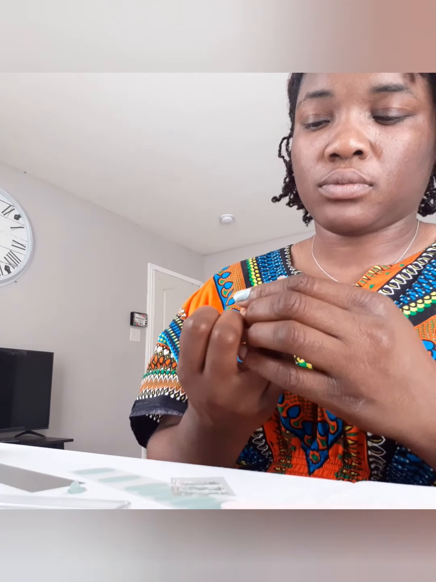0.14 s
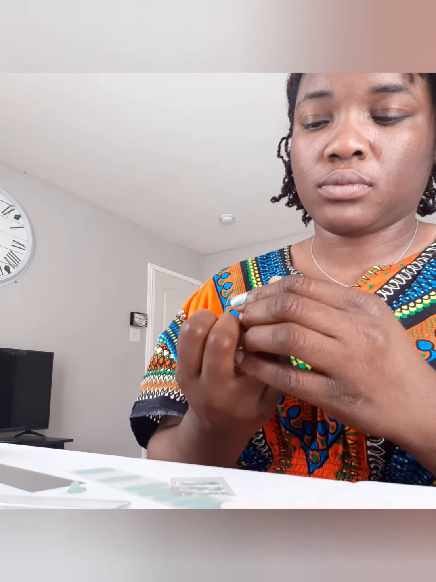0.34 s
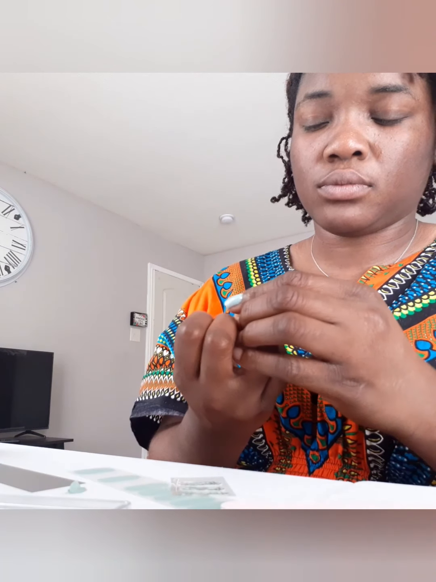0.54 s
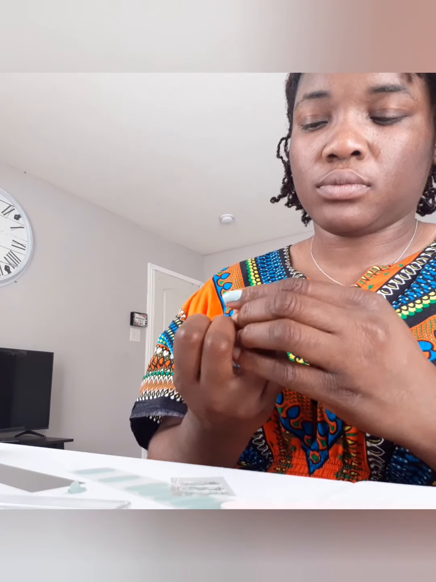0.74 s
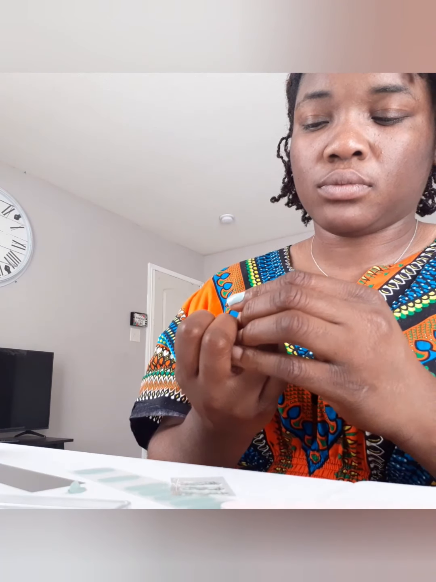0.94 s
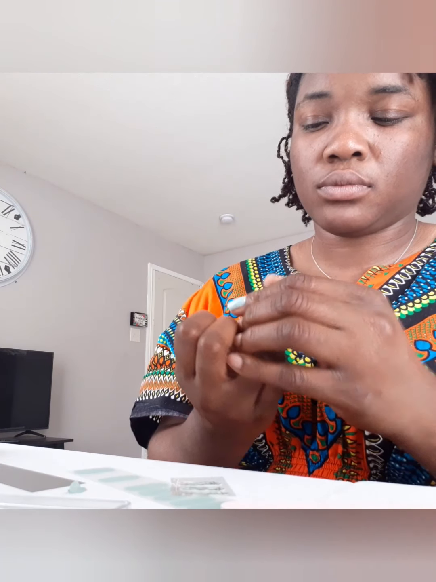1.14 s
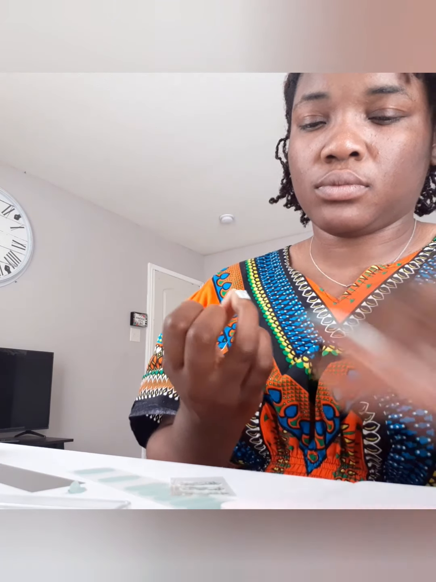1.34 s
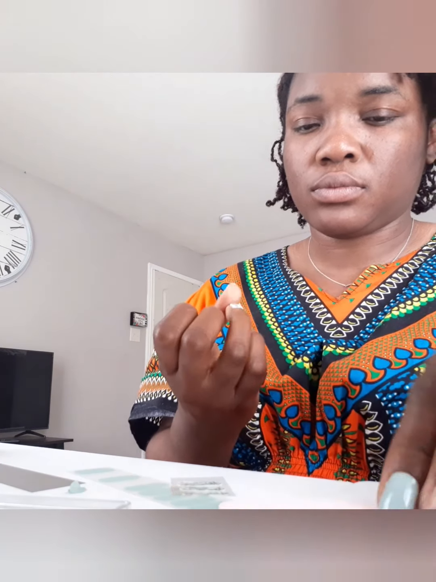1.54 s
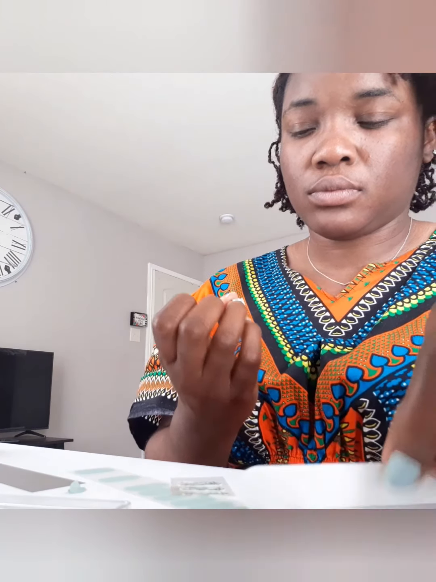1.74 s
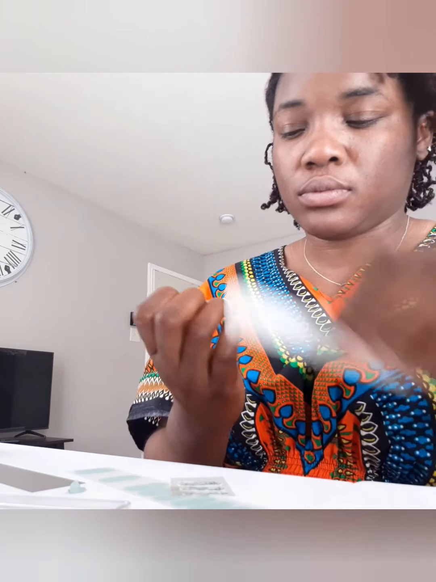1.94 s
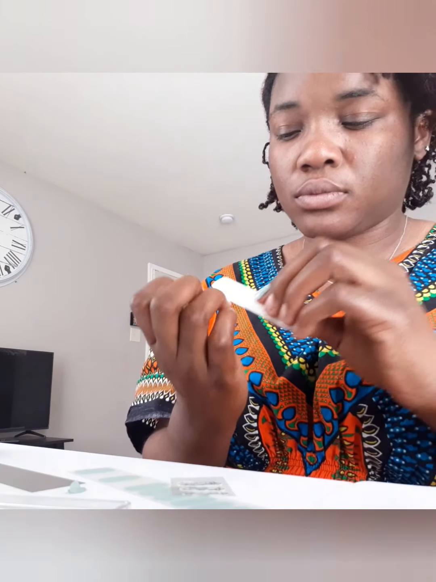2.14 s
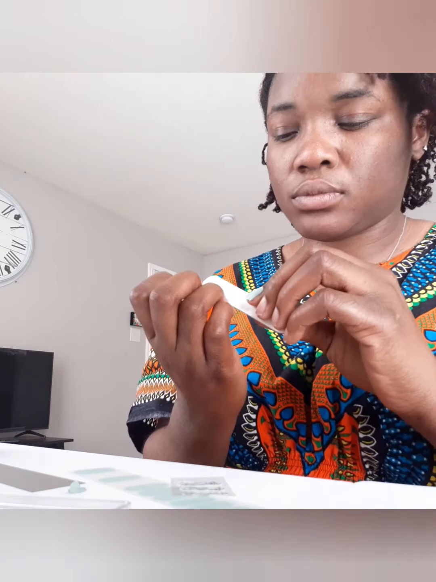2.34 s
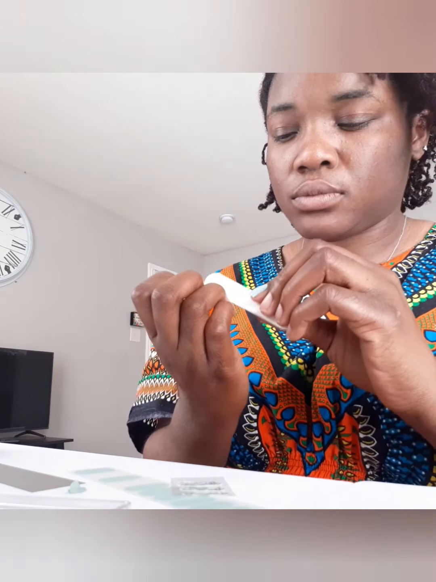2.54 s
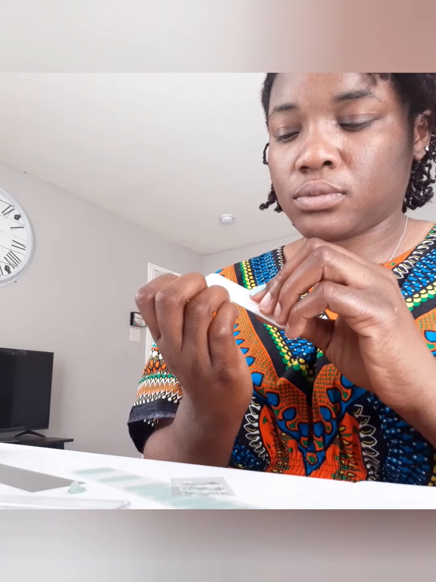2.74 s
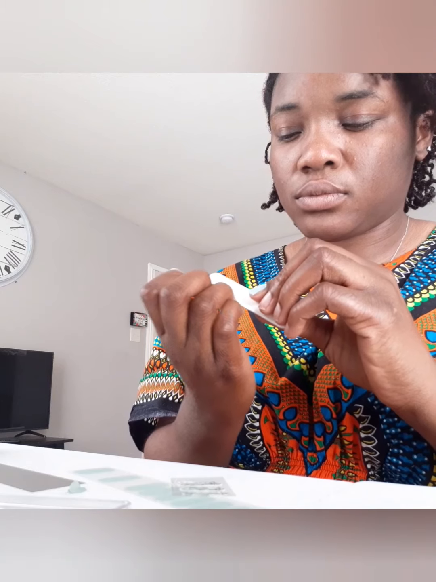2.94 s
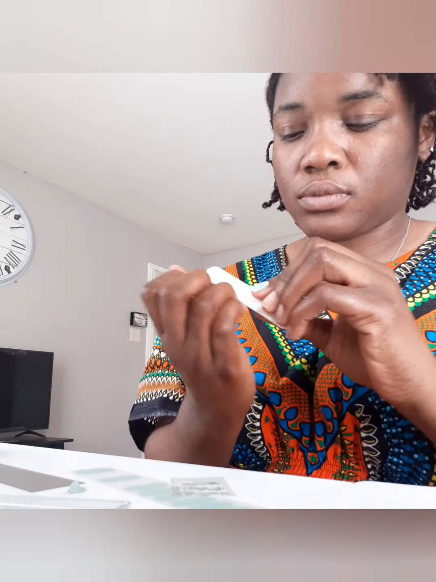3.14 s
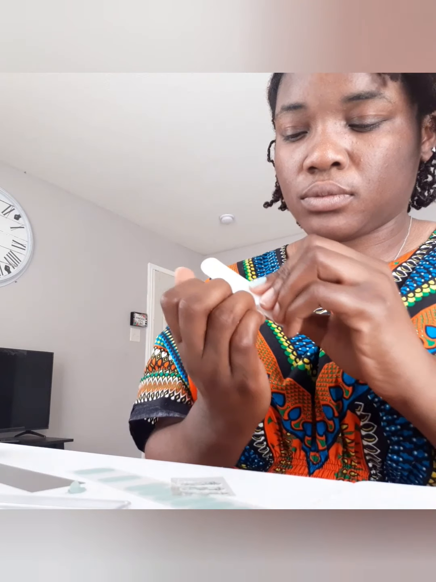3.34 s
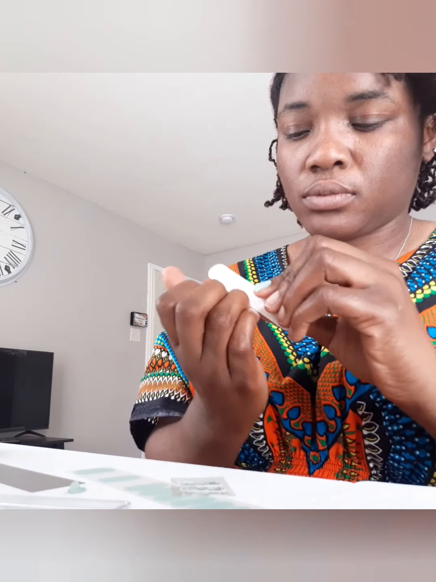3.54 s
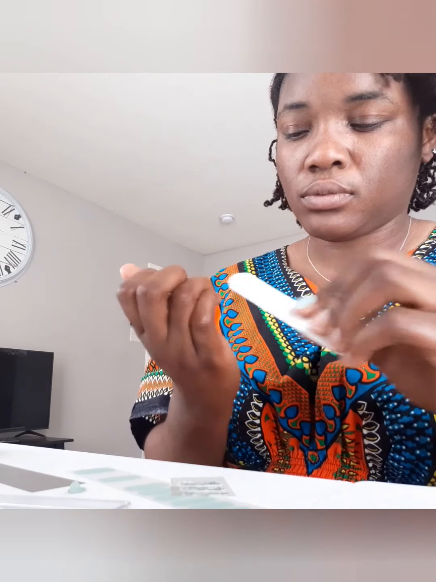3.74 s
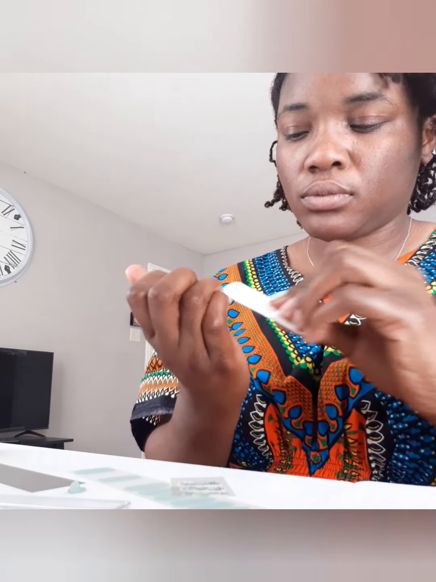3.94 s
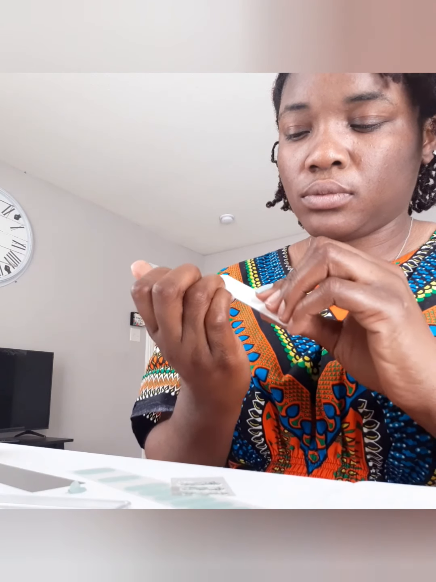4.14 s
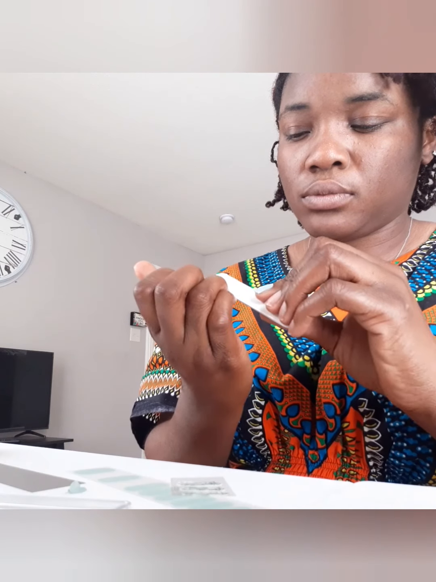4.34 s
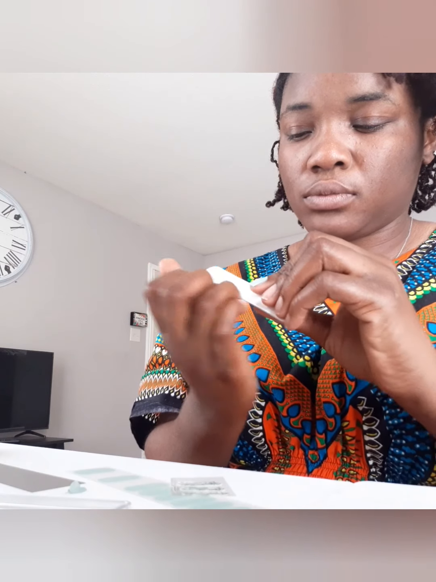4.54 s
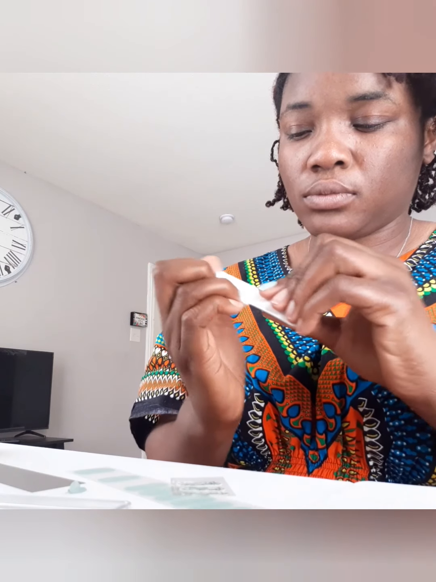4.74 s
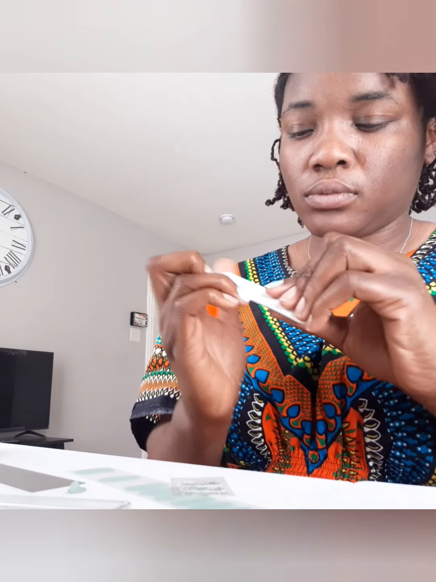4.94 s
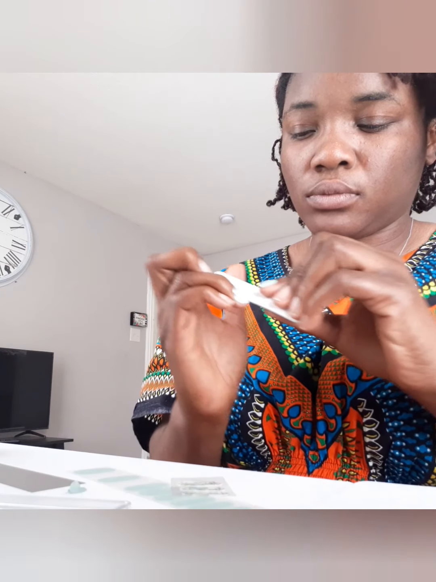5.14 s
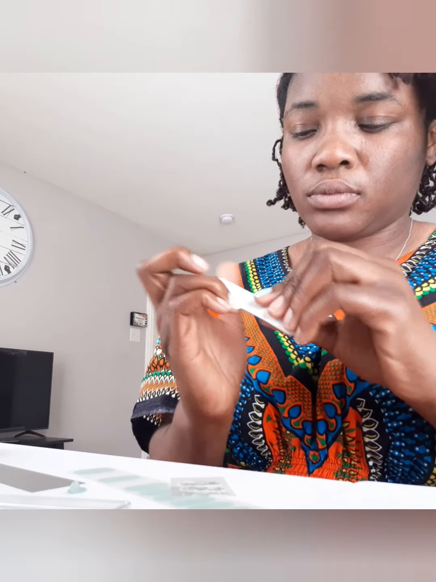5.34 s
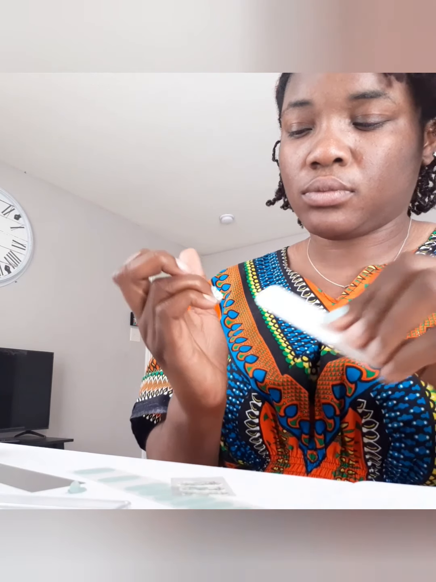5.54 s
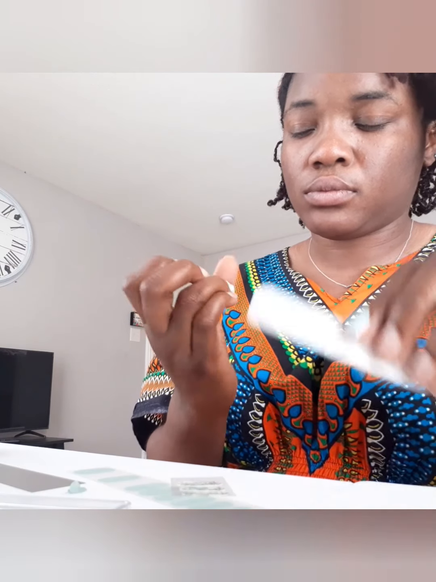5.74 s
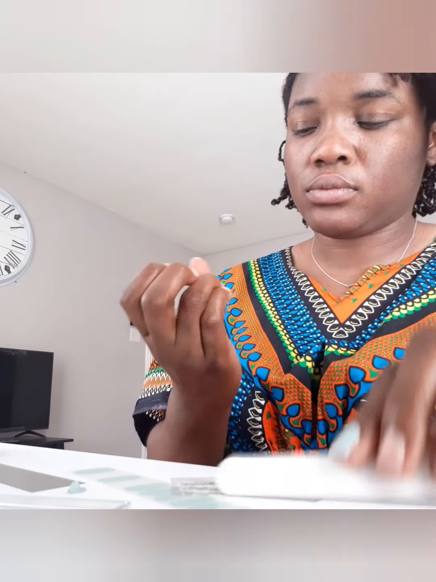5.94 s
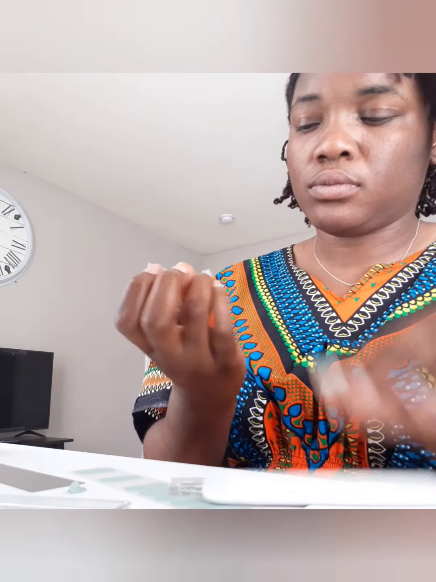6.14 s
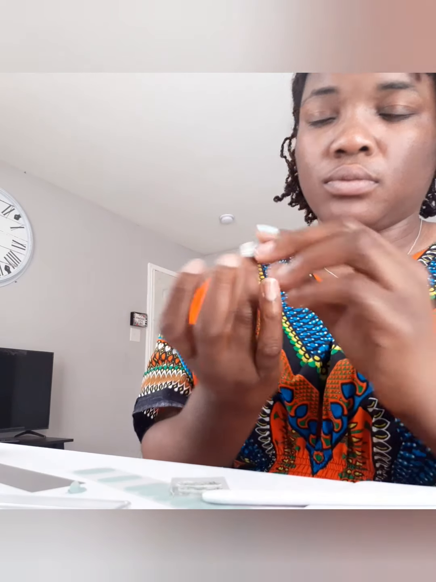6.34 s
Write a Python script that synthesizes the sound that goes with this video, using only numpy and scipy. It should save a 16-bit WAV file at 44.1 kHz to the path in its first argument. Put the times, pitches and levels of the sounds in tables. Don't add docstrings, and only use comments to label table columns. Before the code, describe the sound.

Close stereo phone pickup at a table indoors, faint hum and hiss beneath. A light foam file is dragged off the tabletop with dull knocks and a sharp loud clack, then cloth rustles barely audibly. Quick gritty strokes scratch a nail, pause, and resume softer and more evenly spaced. The file returns with a clack, a brief scrape and a crisp flat slap with a little bounce.

```python
import sys
import numpy as np
from scipy import signal
from scipy.fft import rfft, irfft, next_fast_len
from scipy.io import wavfile
from scipy.ndimage import uniform_filter1d, map_coordinates

SR = 44100
rng = np.random.default_rng(int(sys.argv[2]) if len(sys.argv) > 2 else 0)


def invert_db(level):
    return 10 ** (np.asarray(level, dtype=float) / 20)


def store_pcm(level_fs):
    pcm = np.round(np.clip(level_fs, -1, 1) * 32767).astype(np.int16)
    wavfile.write(sys.argv[1], SR, np.atleast_2d(pcm).T)


N = 285449

# [start t/s, rise t/s, hold t/s, nail ring level/dB, relative dust hiss level/dB]
STROKES = [(3.18, 0.047, 0.015, -62.5, -1.5), (3.282, 0.018, 0.0045, -55, -4.5),
           (3.3, 0.0085, 0.033, -48, -6.5), (3.35, 0.0093, 0.016, -61, -4),
           (3.382, 0.0062, 0.0174, -65.5, -5.5), (3.442, 0.013, 0.04, -57, -1.5),
           (3.651, 0.0038, 0.021, -55, -2), (3.655, 0.031, 0.047, -48.5, 0), (3.69, 0.032, .013, -59, 9.5),
           (4.44, 0.056, 0.055, -61.5, -2.5), (4.615, 0.026, 0.029, -59.5, -1),
           (4.68, 0.018, 0.07, -77, 0.5), (4.745, 0.021, 0.043, -60.5, -3),
           (4.82, 0.013, 0.078, -77.5, -3.5), (4.9, 0.019, 0.017, -61, -0.5),
           (4.95, 0.055, 0.035, -71.5, -6), (5.005, 0.023, 0.06, -60, -4), (5.1, .01, .04, -77, 3),
           (5.135, 0.053, 0.026, -61.5, 0.5), (5.27, 0.024, 0.14, -81, -0.5), (5.385, 0.03, 0.055, -55, 0),
           (5.42, 0.028, 0.012, -57.5, 6.5)]
# [rise power, sag over the hold/dB, release/(dB/s), hiss growth/(dB/s),
# depth below which it lingers/dB, lingering decay/(dB/s)]
STROKE_SHAPE = (0.94, 2.9, 1000, 35, 14, 250)
# [level/dB under a -64 dB contact, share of pressure followed, share lost to hiss]
FINGER_THRUM = (-69, 0.6, 0.68)
# [t/s, level/dB]
FINGER_GRIP = [(3.2, 0.5), (3.32, -6.5), (3.47, -0.5), (3.68, -0.5), (3.73, 4.5), (4.5, -2.5), (4.65, 1.5),
               (4.78, -1.5), (4.93, -0.5), (5.04, -1), (5.12, 7), (5.18, -7), (5.42, -8.5), (5.47, -4)]
# [t/s, share of the stiffer spot 0-1]
NAIL_LEAN = [(3.2, 0.1), (3.3, 0.43), (3.36, 0.34), (3.47, 0.84), (3.66, 0.34), (3.7, .1), (3.73, 0.57),
             (4.47, 0.51), (4.53, 0.66), (4.65, 0.13), (4.77, 0.17), (4.92, 1), (5.02, 0.3), (5.08, 0.5),
             (5.18, 0.6), (5.4, 0.26), (5.46, 0.33)]
# [f/Hz, width/Hz, level/dB]
NAIL_MODES = [(1724, 144, 3.5), (2146, 440, 1.5), (3510, 360, -6.5), (4070, 120, -5.5), (4760, 2200, -6.5),
              (6900, 2050, -12.5)]
# [f/Hz, width/Hz, level/dB]
DUST_MODES = [(8620, 690, 0), (11000, 1500, 0.5), (13000, 1500, -1), (15930, 770, -8)]
# [f/Hz, width/Hz, level/dB]
FINGER_MODES = [(470, 155, -4), (684, 59, 1.5), (964, 520, -2)]
# [f/Hz, width/Hz, level/dB]
FINGERTIP_MODES = [(504, 360, -2), (774, 430, -0.5)]
# [t/s, peak level/dB, relative boom level/dB, relative snap level/dB, ring t60/s]
TICKS = [(3.235, -49.5, -27, -22, 0.012), (3.3942, -74, 3, -4.5, 0.02), (3.6368, -66, -1.5, -4, 0.017),
         (3.654, -61, -14, 1.5, 0.023), (3.7356, -54, 14.5, 6, 0.0064), (3.8791, -70.5, 5.5, -13.5, 0.018),
         (4.621, -73, -13, -6, 0.016), (4.7242, -61, 0, -4, 0.03), (4.848, -70, 10, -9, 0.017),
         (4.918, -51.5, -2, -3.5, 0.021), (5.017, -47.5, -14, -10, 0.036), (4.7511, -49, -28, -10, 0.019),
         (4.9876, -51, -7, -11, 0.02), (5.2697, -61, -8, -18.5, 0.019), (5.2883, -61, -15, -13.5, 0.02),
         (5.3056, -61, -14, -13, 0.031), (5.3317, -69, 4, -6.5, 0.022), (5.4734, -64, 18, 7.5, 0.021)]
# [start t/s, length t/s, level/dB, f/Hz, relative hiss level/dB]
FLICKS = [(3.225, .007, -64, 7500, 8), (3.443, .008, -66, 5500, 2.5), (5.305, .005, -80, 11000, 1),
          (5.348, .005, -80, 9500, 1), (3.305, 0.02013, -51, 2200, -14), (3.683, 0.023, -47.5, 1757, -15),
          (3.7397, 0.0054, -42.5, 5300, 7), (3.739, 0.0075, -48, 2200, -5), (3.749, 0.0056, -68, 6000, 1.5),
          (4.705, .005, -78, 9500, -2.5), (4.986, 0.0034, -69, 6000, 1), (5.092, .008, -63, 1900, -20),
          (5.47, 0.0057, -58, 4970, 4.5)]
# [f/Hz, level/dB]
NAIL_SIDE = [(400, 13.5), (1000, 2.5), (1600, 15), (2400, 14), (3600, -0.5), (5000, 18), (7000, -7.5),
             (9000, -3.5), (12000, 2.5), (15000, 10)]


def filing():
    levels = pressure(STROKES, STROKE_SHAPE, FINGER_THRUM)
    levels[2] += np.interp(np.arange(N) / SR, *np.transpose(FINGER_GRIP))
    rasp = friction(levels, (NAIL_MODES, DUST_MODES, FINGER_MODES), gain_db=1.5, alike=(.6, .45, .6),
                    per_s=12000, spread_db=3.5, clump_db=1.5, shift_db=2.0, lean=NAIL_LEAN, stiffer=1.143)
    ticks = blows(TICKS, (NAIL_MODES[:3], DUST_MODES, FINGERTIP_MODES), (4, -3, 2.5), rattles_db=(-18, -12, -26))
    flicks = scuffs(FLICKS, DUST_MODES, sharpness=4.9)
    return heard(rasp, ticks + flicks, NAIL_SIDE, lag=4, right_db=-3.0, near_db=-9.0, room_db=-10.0)


# [start t/s, length t/s, level/dB, from f/Hz, to f/Hz]
SINGS = [(3.2, .05, -64, 2300, 1760), (3.295, .085, -58, 2200, 1900), (3.3, 0.054, -59.5, 4130, 4300),
         (3.445, 0.046, -60, 2300, 2420), (3.45, 0.042, -63.5, 3620, 3550), (3.665, .07, -54.5, 1800, 2070),
         (3.69, .05, -57.5, 11500, 11800), (4.46, 0.074, -66, 2050, 2200), (4.465, .09, -65.5, 9900, 10200),
         (4.62, .058, -66, 2010, 1790), (4.625, 0.042, -64.5, 8700, 8900), (4.76, 0.045, -59.5, 2300, 2200),
         (4.76, 0.033, -64.5, 8800, 8900), (4.905, 0.065, -63.5, 2300, 1910),
         (5.018, .085, -56.5, 2410, 2050), (5.015, .06, -64, 8700, 8540), (5.15, .05, -62, 2400, 2470),
         (5.185, .05, -66.5, 1800, 1720), (5.16, .05, -67, 3460, 3500), (5.395, 0.063, -62, 1820, 1890),
         (5.43, .05, -56, 11200, 14500)]


def singing():
    spots = []
    for s, length, db, *pitches in SINGS:
        for late, hz in zip((0, .38), pitches):
            spots.append((s + late * length, .62 * length, db, hz, -24))
    sung = scuffs(spots, DUST_MODES, sharpness=11.0)
    return heard(np.zeros((2, N)), sung, NAIL_SIDE, lag=4, right_db=-9.0, near_db=-7.0, room_db=-13.0)


# [start t/s, rise t/s, hold t/s, scrape level/dB, relative hiss level/dB]
SLIDES = [(1.47, 0.075, 0.03, -53.5, 0.5), (1.56, 0.029, 0.015, -42.5, -5), (1.6, 0.049, 0.012, -40, -10),
          (1.675, 0.032, 0.041, -53.5, -14), (1.733, 0.0046, 0.032, -51, -16.5),
          (1.765, 0.012, 0.057, -48, -10), (1.825, 0.022, 0.013, -44, -17),
          (5.92, 0.05, 0.018, -96.5, 21.5), (5.995, 0.044, 0.023, -51, -10.5),
          (6.04, 0.0064, 0.018, -34.5, -19.5), (6.085, 0.023, 0.04, -57.5, -12.5),
          (6.112, 0.041, 0.014, -49.5, -17.5), (6.245, 0.006, 0.012, -66, -16),
          (6.274, 0.0046, 0.018, -48, -21.5), (6.3, 0.034, 0.13, -74.5, -24)]
SLIDE_SHAPE = (1.2, 6.6, 770, 5, 25, 300)
# [level/dB under a -64 dB contact, share of pressure followed, share lost to hiss]
TABLE_DRONE = (-66, 0.84, 0.32)
# [t/s, share of the stiffer spot 0-1]
TABLE_LEAN = [(1.5, 0.46), (1.6, 0.3), (1.66, 0.45), (1.76, .6), (1.85, 0.2), (6.0, 0.7), (6.06, 0.03),
              (6.14, 0.3), (6.3, 0.05)]
# [f/Hz, width/Hz, level/dB]
TOP_MODES = [(984, 270, 6), (1450, 450, -0.5), (2030, 764, -3.5), (3014, 1400, -4.5), (4600, 1600, -7)]
# [f/Hz, width/Hz, level/dB]
FOAM_MODES = [(6500, 4900, -15), (9600, 2500, -2.5), (11500, 2500, -1.5), (14500, 3400, -7)]
# [f/Hz, width/Hz, level/dB]
BOOM_MODES = [(203.4, 82, -4), (308.7, 45, 0), (506, 81, -2), (770, 330, -10)]
# [t/s, peak level/dB, relative boom level/dB, relative snap level/dB, ring t60/s]
KNOCKS = [
    (1.31, -61.5, 4.5, -8, 0.18),
    (1.456, -64, 0, -9, 0.05),
    (1.48, -72, 22, -22, 0.06),
    (1.66, -49.5, 14, -13.5, 0.099),
    (1.565, -39, -3.5, -1, 0.39),
    (1.738, -43.5, -2, 3, 0.03),
    (5.604, -65.5, 2.5, -4.5, 0.13),
    (5.802, -64.5, -2, -7, 0.087),
    (6.024, -41.5, 5, -7.5, 0.15),
    (6.136, -45.5, -2.5, -27, 0.4),
]
# [f/Hz, width/Hz, level/dB]
THUD_MODES = [(1030, 100, 9.5), (1400, 520, 1), (2200, 920, -2), (3400, 1700, -6)]
# [f/Hz, width/Hz, level/dB]
SNAP_MODES = [(2480, 1800, -7.5), (4600, 1300, -1), (6600, 2000, -7.5), (8994, 1300, -1.5),
              (11700, 7200, -9.5)]
# [t/s, peak level/dB, relative boom level/dB, relative snap level/dB, ring t60/s]
DROPS = [
    (6.2418, -27.5, 2.5, 3.5, 0.019),
    (6.2448, -27.5, -4, -27, 0.04),
    (6.2785, -42.5, 2, -24, 0.1),
]
# [f/Hz, width/Hz, level/dB]
FLAT_MODES = [(1065, 72, 10), (1300, 470, -2), (2200, 1400, -11.5), (3400, 710, -8.5)]
# [f/Hz, width/Hz, level/dB]
SLAP_MODES = [(2480, 1800, -8.5), (4546, 1700, 0.5), (5730, 1500, -2.5), (9500, 2100, -9),
              (11200, 1500, -16.5)]
# [t/s, peak level/dB, relative boom level/dB, relative snap level/dB, ring t60/s]
CLACKS = [
    (1.7833, -11, -13.5, -30, 0.06),
    (6.046, -29.5, -8, -23, 0.082),
    (6.092, -61.5, 17, -15, 0.068),
]
# [f/Hz, width/Hz, level/dB]
RIM_MODES = [(758.5, 200, 4), (1150, 200, 5.5), (1710, 300, -2.5), (2028, 160, -0.5), (2700, 1700, -9.5)]
# [f/Hz, width/Hz, level/dB]
RIM_BOOM_MODES = [(231.4, 140, -5), (296, 25, 1.5), (500, 92, 1), (800, 150, -9)]
# [start t/s, length t/s, level/dB, f/Hz, relative hiss level/dB]
SCUFFS = [(1.478, .02, -48, 259.4, -40), (1.737, 0.0056, -49.5, 1913, -0.5), (6.3, 0.067, -59, 940, -18),
          (1.565, 0.011, -40, 1150, -12), (1.581, 0.015, -36.5, 1400, -11),
          (1.589, 0.011, -45, 3130, -10.5), (1.634, 0.026, -38, 1384, -19), (1.652, 0.008, -46, 4600, -11),
          (1.736, 0.0078, -45.5, 4880, 1.5), (1.744, 0.012, -51, 3400, -10.5),
          (1.765, 0.013, -54, 3320, -19.5), (1.771, 0.015, -43, 1283, -17), (1.837, 0.0081, -46, 3200, -16),
          (1.847, 0.014, -46.5, 3220, -1.5), (6.022, 0.0066, -42.5, 1990, -14.5),
          (6.045, 0.019, -35.5, 1127, -21.5), (6.055, 0.012, -38, 3290, -15), (6.09, .018, -52, 594, -24.5),
          (6.134, 0.01, -50, 3200, -16.5), (6.148, .016, -47.5, 1096, -19), (6.25, 0.016, -37, 1050, -22.5),
          (6.277, 0.017, -39, 1030, -23.5), (6.252, .014, -38, 326, -30.5), (6.06, 0.011, -38, 518, -30),
          (1.79, 0.025, -41, 1070, -20)]
# [f/Hz, level/dB]
TABLE_SIDE = [(200, 2), (350, 7.5), (850, -1), (1200, 6.5), (3000, 5), (4300, 3), (8000, -3.5),
              (10500, 12.5), (15000, 6.5)]


def table():
    levels = pressure(SLIDES, SLIDE_SHAPE, TABLE_DRONE)
    scrape = friction(levels, (TOP_MODES, FOAM_MODES, BOOM_MODES), gain_db=-1.5, alike=(.5, .3, .75),
                      per_s=9800, spread_db=0.0, clump_db=0.5, shift_db=3.0, lean=TABLE_LEAN, stiffer=1.33)
    gains_db = (4, 4, 2.5)
    hits = blows(KNOCKS, (THUD_MODES, SNAP_MODES, BOOM_MODES), gains_db, rattles_db=(-29, -11, -29))
    hits += blows(DROPS, (FLAT_MODES, SLAP_MODES, BOOM_MODES), gains_db, rattles_db=(-25, -11, -29))
    hits += blows(CLACKS, (RIM_MODES, SNAP_MODES, RIM_BOOM_MODES), gains_db, rattles_db=(-31, -12, -28))
    hits += scuffs(SCUFFS, SNAP_MODES, sharpness=9)
    return heard(scrape, hits, TABLE_SIDE, lag=21, right_db=-9.0, near_db=-13.5, room_db=-14.0)


def pressure(rows, shape, low):
    power, sag_db, release_db, grows_db, linger_db, dies_db = shape
    low_db, follows, lost = low
    energy = np.full((3, N), 1e-14)
    for s, rise, hold, db, hiss_db in rows:
        a = round(s * SR)
        t = np.arange(min(round((rise + hold) * SR) + SR // 12, N - a)) / SR
        after = np.maximum(t - rise - hold, 0)
        swell = 20 * power * np.log10(np.clip(t / max(rise, .002), 1e-3, 1))
        sag = sag_db * np.clip((t - rise) / max(hold, .002), 0, 1)
        release = np.minimum(release_db * after, linger_db + dies_db * after)
        growth = grows_db * np.minimum(t - rise, hold).clip(-.05, .05)
        main = np.full(len(t), db)
        deep = np.full(len(t), low_db + follows * (db + 64) - lost * hiss_db)
        levels = np.array([main, db + hiss_db + growth, deep])
        energy[:, a:a + len(t)] += invert_db(swell - sag - release + levels) ** 2
    return 10 * np.log10(energy)


def friction(levels, bodies, gain_db, alike, per_s, spread_db, clump_db, shift_db, lean, stiffer):
    touching = levels[0] > -135
    sizes = grit(touching.sum(), per_s, spread_db, clump_db)
    stiff = np.clip(np.interp(np.flatnonzero(touching) / SR, *np.transpose(lean)), 0, 1)
    rub = 0
    for k, (db, share, body) in enumerate(zip(levels[:, touching], alike, bodies)):
        a, b = sizes * rng.choice([-1, 1], (2, len(sizes)))
        grains = np.array([a, share * a + np.sqrt(1 - share ** 2) * b])
        ring = unit(ringing(grains, body))
        if k == 0:
            raised = [(hz * stiffer, width, gain) for hz, width, gain in body]
            stiff_ring = unit(ringing(grains[:, ::-1], raised))
            ring = np.sqrt(1 - stiff) * ring + np.sqrt(stiff) * stiff_ring
        rub = rub + invert_db(db + gain_db) * ring
    out = np.zeros((2, N))
    out[:, touching] = shifting(rub, shift_db)
    return out


def grit(size, per_s, spread_db, clump_db):
    chance, rarity = rng.random((2, size))
    sizes = invert_db(-spread_db * np.log(rarity + 4e-3) + clump_db * wobble(90, size))
    return (chance < per_s / SR) * sizes


def shifting(x, depth_db):
    z = signal.stft(x, nperseg=256)[2]
    field = rng.standard_normal(z.shape[1:])
    field = uniform_filter1d(uniform_filter1d(field, size=7, axis=0), size=16, axis=1)
    return signal.istft(z * invert_db(depth_db * unit(field)), nperseg=256)[1][:, :x.shape[1]]


def blows(events, bodies, gains_db, rattles_db):
    out, t = np.zeros(N + SR), np.arange(SR // 8) / SR
    lives = (1, .4, 1.3)
    for s, db, low_db, snap_db, t60 in events:
        noise = rng.standard_normal(len(t))
        start = round((s + .0012) * SR)
        levels = (db, db + snap_db, db + low_db)
        for level, gain_db, rattle_db, life, body in zip(levels, gains_db, rattles_db, lives, bodies):
            rattle = invert_db(rattle_db - 60 * t / max(life * t60, .003)) * noise
            rattle[0] = -1
            struck = [(hz * (1 + 0.017 * rng.normal()), w, g + rng.normal()) for hz, w, g in body]
            ring = ringing(rattle, struck)
            out[start:start + len(t)] += invert_db(level + gain_db) * ring / np.abs(ring).max()
    return out[:N]


def scuffs(events, skin, sharpness):
    out = np.zeros(N + SR)
    for s, length, db, hz, hiss_db in events:
        noise = rng.standard_normal((2, SR // 16))
        u = np.arange(SR // 16) / SR / max(length, .002)
        swell = np.sin(np.pi * np.clip(u, 0, 1) ** 0.7)
        grains = noise * invert_db(2.5 * noise[::-1])
        ring = ringing(grains[0], [(hz, hz / sharpness, 0)])
        hiss = ringing(grains[1], skin)
        sing = ring / np.std(ring[u < 1]) + invert_db(hiss_db) * hiss / np.std(hiss[u < 1])
        out[round(s * SR):][:len(u)] += invert_db(db) * swell * sing
    return out[:N]


def ringing(x, modes):
    lo, hi = 0.49 * modes[0][0], 1.225 * modes[-1][0]

    def response(f):
        skirt = (1j * f / lo) ** 2 / (1 + 1.1j * f / lo - (f / lo) ** 2)
        skirt = skirt / (1 + 1.4j * f / hi - (f / hi) ** 2)
        total = 0
        for k, (centre, width, db) in enumerate(modes):
            damping = 1j * f * width
            total = total + (-1) ** k * invert_db(db) * damping / (centre ** 2 - f ** 2 + damping)
        return skirt * total

    return filtered(x, response)


# [f/Hz, t60/s]
ROOM = [(200, 0.4), (1000, 0.19), (4000, 0.12), (12000, .13)]


def heard(rub, hits, side, lag, right_db, near_db, room_db):
    step = SR // 12
    source = rub[0] + hits
    out = np.zeros((2, N + SR))
    out[0, :N] = source
    out[1, lag:N + lag] = rub[1] + invert_db(right_db) * hits
    rooms = [invert_db(room_db) * tail(ROOM, 0.64) for _ in range(7)]
    near_gains = invert_db(near_db + np.array([[-3], [1.5]]))
    nears = [near_gains * tail([(300, 0.046), (8000, 0.013)], 0.08) for _ in range(7)]
    fade = np.hanning(2 * step)
    for k, a in enumerate(range(0, N - 2 * step, step)):
        for x, paths, delay in ((source, rooms, 400), (hits, nears, 60)):
            piece = x[a:a + 2 * step]
            if np.abs(piece).max() < 1e-7:
                continue
            wet = signal.fftconvolve((fade * piece)[None], paths[k % 7], axes=1)
            out[:, a + delay:a + delay + wet.shape[1]] += wet

    def tilt(hz):
        pair = invert_db(np.outer([.5, -.5], along(side, hz)))
        return 2 * pair / pair.sum(axis=0)

    return filtered(out[:, :N], tilt)


def tail(t60, seconds):
    hz, t, z = signal.stft(rng.standard_normal((2, round(seconds * SR))), SR, nperseg=256)
    x = signal.istft(z * invert_db(-60 * t / along(t60, hz)[:, None]), SR, nperseg=256)[1]
    return x / np.linalg.norm(x[0])


# [start t/s, rise t/s, hold t/s, level/dB, relative hiss level/dB]
SLEEVES = [
    (1.95, 0.31, 0.33, -75.5, 0),
    (3.75, .15, 0.36, -80.5, 0),
]
# [f/Hz, width/Hz, level/dB]
CLOTH_MODES = [(503, 70, 2), (970, 780, -14.5), (2150, 1700, -17)]


def sleeves():
    level_db = pressure(SLEEVES, (0.0, 6, 150, 0, 30, 150), (0, 0, 0))[0] + 2.2 * wobble(23)
    rustle = unit(ringing(rng.standard_normal((2, N)), CLOTH_MODES))
    return invert_db(level_db + np.array([[2.5], [-3]])) * rustle


# [f/Hz, rms level/dB, unsteadiness/dB]
HUM = [(119.7, -57.5, 2), (133.6, -66.5, 4.5), (148.8, -68, 4.5), (225, -67.5, 3), (301, -74, 3.5)]
# [t/s, level/dB]
MOTOR = [(0, -75), (.7, -61.5), (1.12, -58.5), (1.42, -66.5), (1.9, -58), (2.27, -77), (2.54, -60.5),
         (3.12, -76.5), (3.5, -65.5), (3.95, -68), (4.29, -61.5), (4.75, -59), (5.06, -66.5), (5.39, -75),
         (5.5, -65.5), (6.1, -70), (6.4, -68)]
# [f/Hz, level/(dB per Hz)]
RUMBLE = [(22, -43.5), (40, -17), (50, -10.5), (62, -2.5), (100, -10), (135, -6.5), (185, -9), (240, -7.5),
          (275, -18), (320, -15.5), (400, -22), (690, -34.5), (1500, -45), (3300, -94.5)]
# [f/Hz, coherence]
RUMBLE_ALIKE = [(200, 0.77), (300, 0.85), (430, .58), (600, 0.56), (850, 0.47), (1200, .02)]
# [f/Hz, level/dB]
AIR_SIDE = [(60, 2.5), (110, 6.5), (220, 5), (400, 12.5), (700, 2.5), (1200, 5.5), (4000, -2)]


def appliance():
    t = np.arange(N) / SR

    def line(hz, db, shake):
        phase = 0.1 * shake * wobble(5.0) + 6 * rng.random()
        return np.sqrt(2) * invert_db(db + shake * wobble(7)) * np.sin(2 * np.pi * hz * t + phase)

    def mid_side(hz):
        angle = np.arccos(np.clip(along(RUMBLE_ALIKE, hz), -1, 1)) / 2
        return invert_db(along(RUMBLE, hz)) * [np.cos(angle), np.sin(angle)]

    lines = sum(line(*row) for row in HUM)
    lines = lines + line(74.4, np.interp(t, *np.transpose(MOTOR)) - 1.5, shake=2.5)
    mid, side = filtered(rng.standard_normal((2, N)), mid_side)
    rumble = invert_db(-60.74 + 0.6 * wobble(1.3)) * unit(np.array([mid + side, mid - side]))
    return filtered(lines + rumble, lambda hz: invert_db(np.outer([.5, -.5], along(AIR_SIDE, hz))))


def wobble(rate, size=N):
    coarse = np.arange(0, size + 32, 32)
    knots = rng.standard_normal(int(N * rate / SR) + 4)
    return np.interp(np.arange(size), coarse, map_coordinates(knots, [coarse * rate / SR]))


def filtered(x, response):
    m = next_fast_len(x.shape[-1] + 8192)
    return irfft(rfft(x, m) * response(np.fft.rfftfreq(m, 1 / SR)), m)[..., :x.shape[-1]]


def along(points, hz):
    f, v = np.transpose(points)
    return np.interp(np.log(hz + 1), np.log(f + 1), v)


def unit(x):
    return x / np.sqrt(np.mean(x ** 2) + 1e-20)


# [f/Hz,
# level/dB]
NAIL_SHADE = [(1100, -0.5), (1430, -4.5), (1620, -3), (2550, 0), (2850, -4), (3300, -1), (7000, 0),
              (8200, 0.5), (12500, -1), (13800, -2.5), (15000, 3)]


def scene():
    nail = filing() + singing()
    shaded = filtered(nail, lambda hz: invert_db(along(NAIL_SHADE, hz)))
    return shaded + table() + sleeves() + appliance()


def roll_off(x):
    return signal.sosfilt(signal.butter(12, 16510, fs=SR, output="sos"), x)


# [f/Hz, level/(dB per Hz)]
HISS = [(590, -27.5), (1000, -3), (1050, -9.5), (1140, -3), (2030, -4), (2200, -6), (3840, -8), (7020, -17),
        (13400, -5.5), (15100, -5.5), (16000, -11)]


def record(dry):
    hiss = unit(filtered(rng.standard_normal((2, N)), lambda hz: invert_db(along(HISS, hz))))
    mix = filtered(dry + invert_db(-80) * hiss, lambda hz: hz < 15830)
    return roll_off(mix)


dry = scene()
out = record(dry)
store_pcm(out)
```